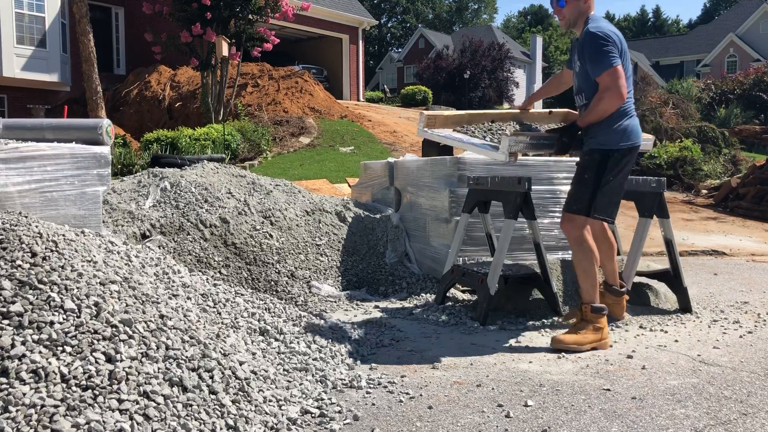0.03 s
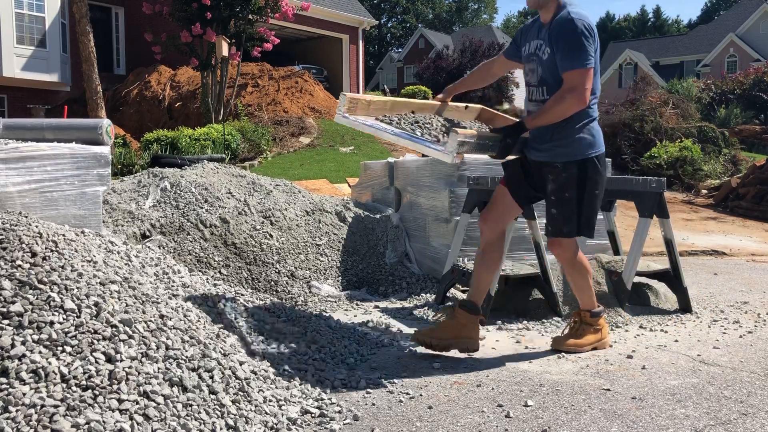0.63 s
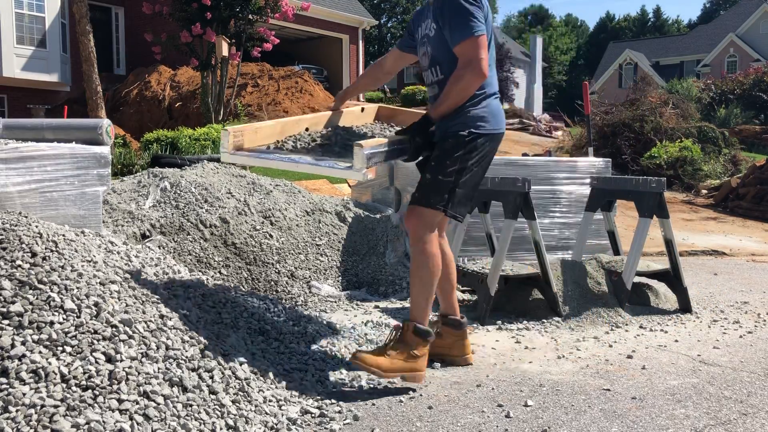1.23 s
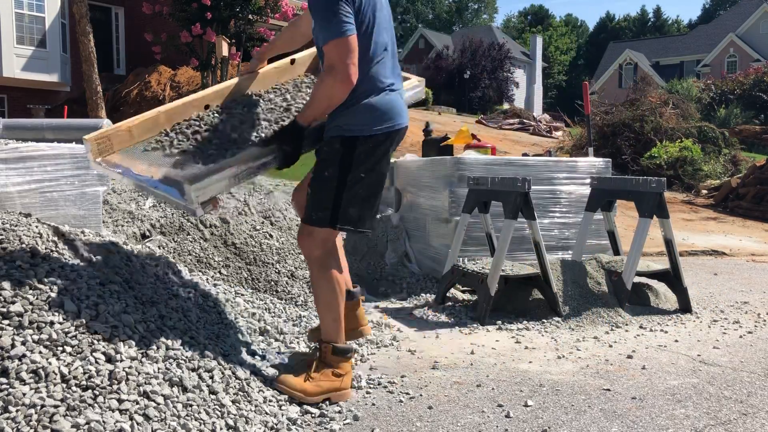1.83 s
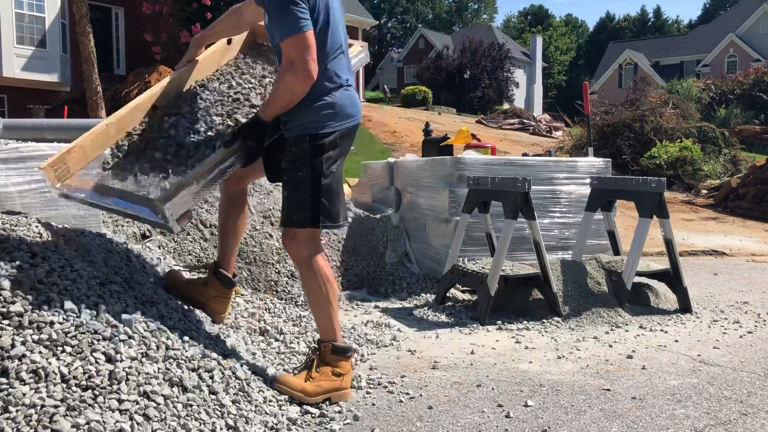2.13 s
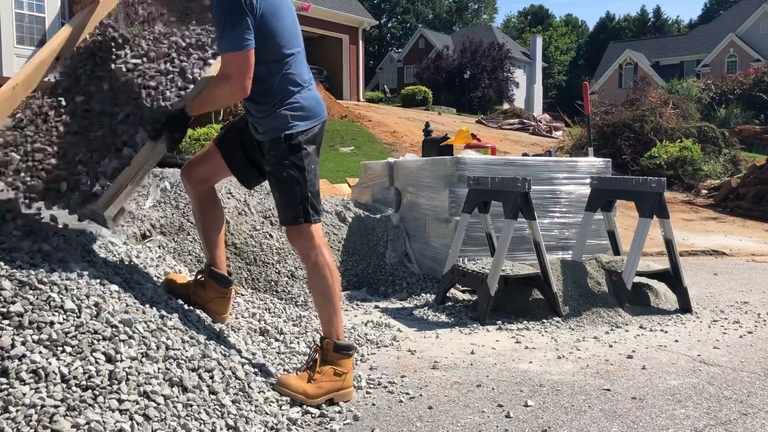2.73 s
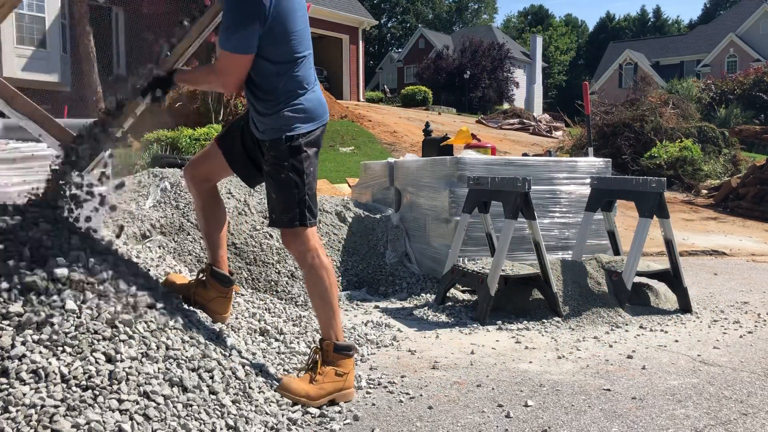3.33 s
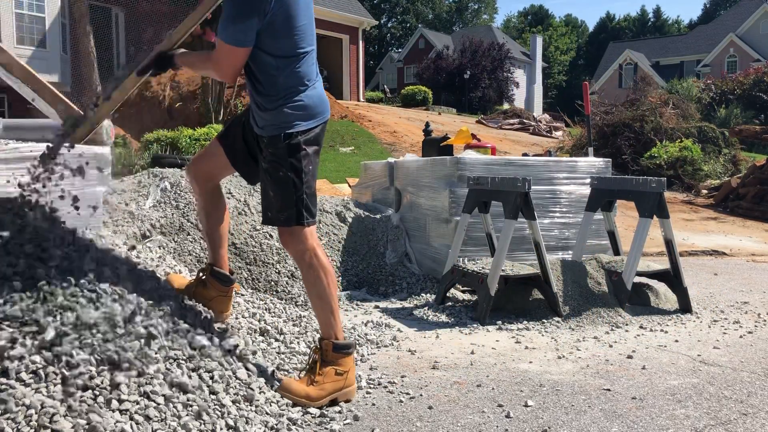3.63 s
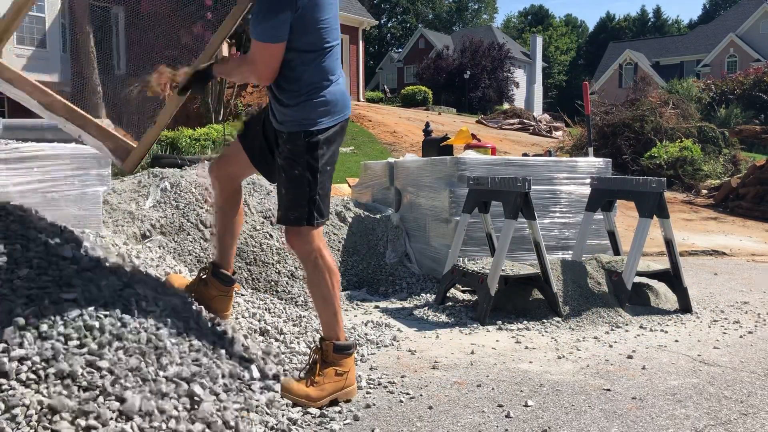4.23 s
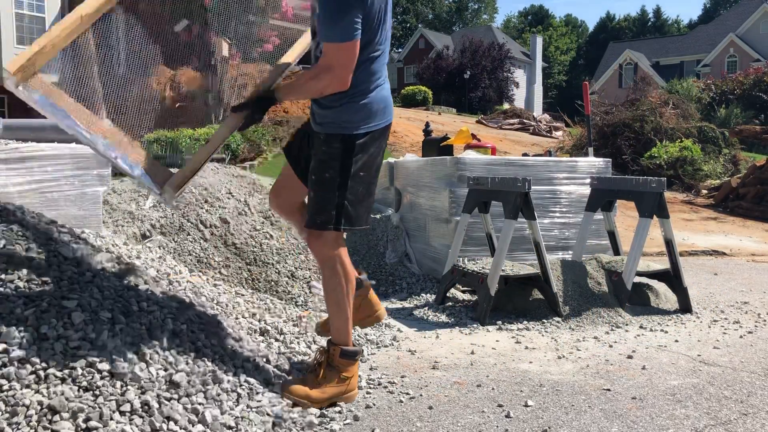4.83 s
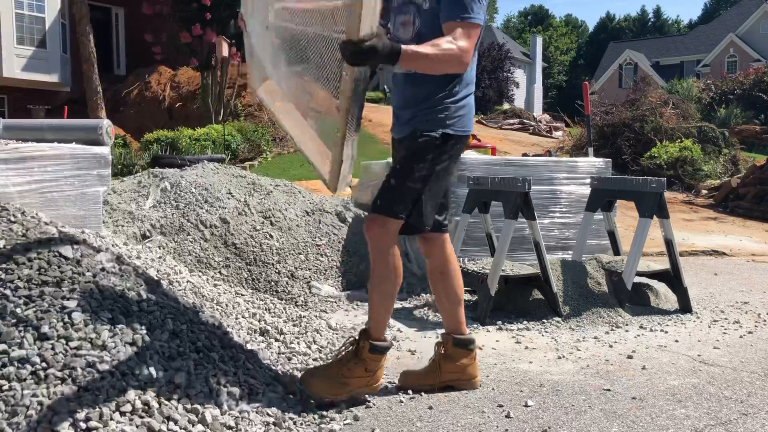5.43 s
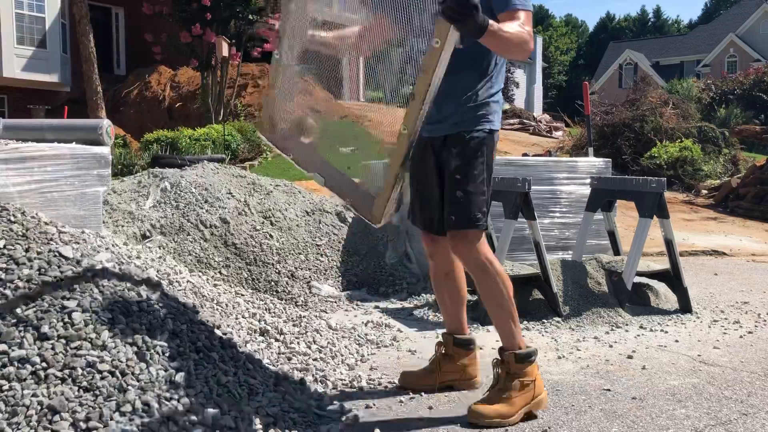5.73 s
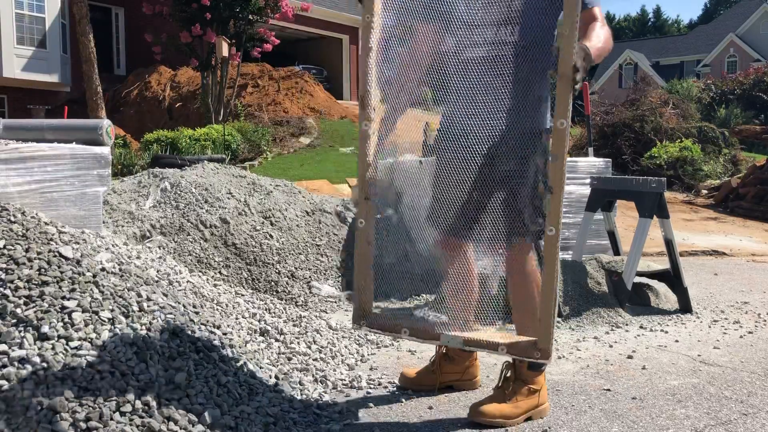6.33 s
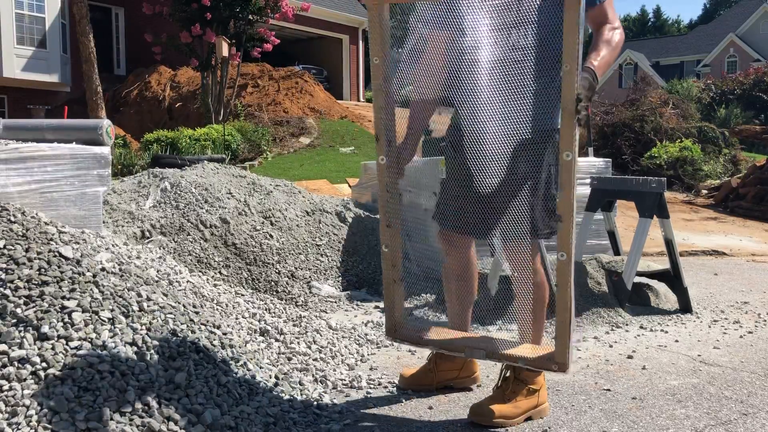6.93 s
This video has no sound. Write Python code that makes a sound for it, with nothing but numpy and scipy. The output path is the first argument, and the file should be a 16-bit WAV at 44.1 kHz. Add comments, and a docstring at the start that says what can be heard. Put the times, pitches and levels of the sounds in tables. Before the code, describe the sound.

Boots crunch over grit, then gravel rushes off a mesh screen onto a pile, trickles down, and the empty screen rattles.

```python
"""Gravel slides off a wood-framed mesh screen as a worker tips it onto a pile.
Many small impacts drive the resonances of the screen, rain on the pile and trickle down its side.
Boots thud and crunch on the gritty driveway as the load is carried, and the emptied screen
rattles as it is stood upright. A distant machine hums under the murmur of the street."""
import sys
import numpy as np
from scipy import signal
from scipy.fft import rfft, irfft, next_fast_len
from scipy.io import wavfile
from scipy.ndimage import uniform_filter1d, map_coordinates

SR = 44100
rng = np.random.default_rng(int(sys.argv[2]) if len(sys.argv) > 2 else 0)


def waveform_to_disk(signal):
    """Save audio, clipped to [-1, 1], as 16-bit WAV at the path in sys.argv[1]."""
    frames = np.transpose(np.atleast_2d(signal))
    scaled = np.clip(frames, -1, 1) * 32767
    samples = np.round(scaled).astype(np.int16)
    wavfile.write(sys.argv[1], SR, samples)


N = 307818
TOP_HZ = 15950  # upper band limit


def gravel_on_mesh():
    """Forced vibration: sliding stones drum on the screen, which brightens as its load runs off."""
    # flow off the tilted mesh: time_s, level_db
    tipping = [(1.88, -60), (1.96, -51), (2.12, -47.5), (2.24, -39.5), (2.52, -35), (2.94, -22.8),
               (3.14, -25), (3.38, -34), (3.68, -36.5), (3.83, -46)]
    # the load shifting as it is carried: start_s, length_s, level_db
    shifts = [(1.038, 0.068, -51), (1.24, 0.13, -56), (1.6, 0.18, -53)]
    # spectrum of the loaded screen: frequency_hz, gain_db
    loaded_spectrum = [(40, -62), (160, -14.5), (330, -7.5), (480, -8), (650, -1.5), (1200, -3), (2800, -6),
                       (4300, -1), (6000, -4), (9000, -12.5), (16000, -18)]
    # spectrum as the load runs off: frequency_hz, gain_db
    running_spectrum = [(40, -51), (160, -17), (300, -23.5), (430, -7.5), (560, -6.5), (720, -9), (950, 0),
                        (1500, -2.5), (2900, -3), (4200, 2), (6000, -1), (8500, -1.5), (10500, -10.5),
                        (16000, -21.5)]
    shifting = sum(swell(s, length, db, rise=110, sag=14, release=150) for s, length, db in shifts)
    flow = level(tipping, fade_s=0.12) + shifting
    share = flow / flow.max()
    stick_slip = amp((1 - np.sqrt(share)) * (2 * wobble(27.95) - 2.54))  # strongest in a slow load
    hits = flow * stick_slip * collisions(1600 + 14000 * share, spread_db=1, ring_s=0.0041)
    loaded = coloured(hits, lambda hz: along(loaded_spectrum, hz) + screen_resonance(hz))
    running = coloured(hits, lambda hz: along(running_spectrum, hz) + screen_resonance(hz))
    emptied = np.interp(np.arange(N) / SR, [2.35, 2.85], [0, 1])
    return amp(5) * (1 - emptied) * loaded + amp(4.5) * emptied * running


def screen_resonance(hz):
    """Resonance: each mode of the mesh and frame adds a bell-shaped peak to the gain in dB."""
    # modes of the screen: centre_hz, width_hz, gain_db
    modes = [(663, 194, 7), (936, 81, 4.5), (1080, 76, 2), (1440, 240, 4.5), (1747, 320, 4),
             (2316, 360, 4.5), (2570, 190, 3.5), (3116, 420, 3.5), (3710, 500, 4.5), (4240, 320, 1)]
    return sum(db / (1 + (2 * (hz - centre) / width) ** 2) for centre, width, db in modes)


def gravel_on_pile():
    """Hard impact: brief stone-on-stone contacts give bright clicks that thin out with the stream."""
    # spectrum of stones landing: frequency_hz, gain_db
    spectrum = [(30, -44), (170, -11.5), (300, -17), (700, -26), (2000, -33), (3800, -10.5), (6000, -6),
                (8500, 0), (12000, -3.5), (16000, -6.5)]
    spilling = np.clip((np.arange(N) / SR - 2.15) / 0.04, 0, 1)  # the first stones leave the edge
    flow = spilling * swell(start_s=2.96, length_s=0.87, db=-25.5, rise=32, sag=4, release=21)
    hits = collisions(200 + 10000 * flow / flow.max(), spread_db=3, ring_s=0.0052)
    hits *= amp(1.45 * wobble(60))
    return amp(1) * coloured(flow * hits, lambda hz: along(spectrum, hz))


def slope_flow():
    """Incoherent addition: runs of stones down the slope sum in power to one amplitude envelope."""
    # runs set off by the pour and by a boot leaving the pile: start_s, length_s, level_db
    runs = [(3.3, 1.9, -26.5), (4.699, .62, -46)]
    power = sum(swell(s, length, db, rise=100, sag=13, release=140) ** 2 for s, length, db in runs)
    return np.sqrt(power)


def trickle(flow):
    """Granular flow: rolling stones collide more rarely and more softly as the flow dies down."""
    # spectrum of rolling stones: frequency_hz, gain_db
    spectrum = [(40, -32), (200, -8), (600, -11.5), (1200, -9), (2700, -7.5), (3800, -1.5), (6500, -1),
                (10000, -12), (16000, -19)]
    hits = collisions(800 + 7000 * flow / flow.max(), spread_db=4, ring_s=0.0049)
    return amp(-1.2) * coloured(flow * hits, lambda hz: along(spectrum, hz))


def collisions(rate_per_s, spread_db, ring_s):
    """Shot noise: stone impacts of uneven size arrive at random, with a mean power near 1."""
    rate = np.clip(rate_per_s * np.ones(N), 20, 12000)
    onsets = np.flatnonzero(rng.random(N) < rate / SR)
    sizes = unit(amp(spread_db * np.minimum(rng.standard_normal(len(onsets)), 2)))
    sizes *= np.sqrt(SR / rate[onsets])
    bank = pebbles(ring_s)
    grains = bank[rng.integers(len(bank), size=len(onsets))] * sizes[:, None]
    positions = onsets[:, None] + np.arange(bank.shape[1])
    return np.bincount(positions.ravel(), grains.ravel(), N)[:N]


def pebbles(ring_s, count=600, size=128):
    """Free vibration: each struck stone in this bank of clicks rings in three quickly damped modes."""
    t = np.arange(size) / SR
    hz = rng.uniform(0, TOP_HZ, (count, 3, 1))
    t60 = ring_s * np.exp(0.5 * rng.standard_normal((count, 3, 1)))
    bank = (np.cos(2 * np.pi * hz * t) * amp(-60 * t / t60)).sum(1)
    bank *= rng.choice([-1, 1], (count, 1))
    return bank / np.linalg.norm(bank, axis=1, keepdims=True)


def stone_snaps(grit, flow):
    """Impact and settling: one stone clicks against another, then chatters briefly."""
    # the loudest snaps: start_s, level_db, pitch_hz, edge_db
    snaps = [(0.17, -26, 6800, -28), (0.2446, -20.5, 8680, -29), (0.397, -25.5, 4700, -17),
             (0.4318, -26.5, 6690, -24), (0.4983, -29.5, 5060, -19), (0.699, -28, 4870, -20),
             (0.761, -29, 5300, -17), (0.866, -24, 4470, -13), (0.877, -29, 5130, -8),
             (1.2242, -28, 7370, -4.5), (1.279, -33, 4960, -9), (1.514, -29.5, 4400, -6),
             (1.705, -32, 4660, -3), (4.5796, -24, 7000, -14), (4.6818, -17, 6400, -14),
             (4.7334, -13, 5760, -18), (4.817, -20.5, 4200, -27), (4.9904, -19.5, 4840, -18),
             (5.0663, -23.5, 6700, -27), (5.367, -22, 6620, -24), (5.7677, -21, 5900, -23),
             (5.8494, -16, 4300, -17), (6.3343, -31, 5110, -14), (6.3648, -27, 5370, -9),
             (6.4402, -30, 4600, -20), (6.5969, -31.5, 4900, -12), (6.6935, -33, 5100, -13),
             (6.7252, -34.5, 6950, -2)]
    out = np.zeros(N)
    stir = amp(23) * grit + amp(15.5) * flow
    for s, db, hz, edge_db in snaps + stray_snaps(stir):
        click = burst(t60=0.0032, rise_s=0.00005)
        chatter = amp(-17) * burst(t60=0.025, rise_s=0.001)
        add(out, s, stone(click + chatter, db - 11.5, hz, db + edge_db, octaves=0.75))
    return out


def stray_snaps(stir, count=150, rate_per_s=17):
    """Random impacts, as loud as the stones are stirred: start_s, level_db, pitch_hz, edge_db."""
    start_s = (np.arange(count) + rng.random(count)) / rate_per_s
    size, pitch, edge = np.clip(rng.standard_normal((count, 3)), -2, 2).T
    stir_db = 20 * np.log10(np.interp(start_s, np.arange(N) / SR, stir) + 1e-9)
    return list(zip(start_s, stir_db + 3.5 * size, 5750 * 2 ** (0.31 * pitch), -19.5 + 4 * edge))


def stone(contact, body_db, pitch_hz, edge_db, octaves):
    """Source and filter: a contact excites the stone's body, and a hard one adds a sharp edge."""
    # spectrum of the sharp edge: frequency_hz, gain_db
    edge_spectrum = [(3000, -54), (9000, -13.5), (12500, 5.5), (15000, -1)]
    resonance, roll_off = hump(pitch_hz, octaves), [(10000, 2), (14000, -12.5)]
    body = coloured(contact, lambda hz: resonance(hz) + along(roll_off, hz))
    edge = coloured(contact, lambda hz: along(edge_spectrum, hz))
    return struck(body, body_db) + struck(edge, edge_db)


def mesh_rattle():
    """Impulsive excitation: the empty mesh slaps its frame and the slack wires ring on unevenly."""
    # slaps of the mesh: start_s, level_db, pitch_hz
    slaps = [(5.873, -18.5, 5000), (5.905, -11.5, 5170), (5.926, -16, 5730), (5.975, -15.5, 2850),
             (6.0105, -18, 2640), (6.16, -26, 4920), (6.266, -23, 4020), (6.349, -28, 2880)]
    # spectrum of a slap: frequency_hz, gain_db
    spectrum = [(200, -12), (650, -6), (950, 1), (1450, -2.5), (2000, -4.5), (3000, -5.5), (5500, -1.5),
                (8000, -8), (10000, -15), (16000, -7)]
    # modes of the wires: pitch_hz, level_db, t60_s
    wire_modes = [(938, 0, 0.37), (1390, 5, 0.15), (1484, -1, 0.34), (1760, 1, 0.2), (2720, 0, 0.31),
                  (3770, -7, .22), (5028, -7, .2), (5700, -14, 0.22)]
    out, t = np.zeros(N), np.arange(SR // 2) / SR
    for s, db, pitch_hz in slaps:
        contact = hump(pitch_hz, octaves=0.97)
        impact = burst(t60=0.037, rise_s=0.00014)
        slap = coloured(impact, lambda hz: along(spectrum, hz) + screen_resonance(hz) + contact(hz))
        add(out, s, struck(slap, db - 12.5))
        for hz, mode_db, t60 in wire_modes:
            jittered_hz = hz + 14 * np.sqrt(hz) * rng.standard_normal(len(t))
            phase = 2 * np.pi * np.cumsum(jittered_hz) / SR
            onset_db = db - 34.5 + mode_db + 2 * rng.standard_normal()
            add(out, s, amp(onset_db - 60 * t / t60) * np.sin(phase))
    return out


def sole_pressure():
    """Contact loading: each step swells and fades, giving envelopes for grit and for bare concrete."""
    # a sole pressing and dragging: start_s, length_s, grit_db, scuff_db
    steps = [(0.02, 0.23, -58, -53.5), (0.35, 0.38, -53.5, -62.5), (0.82, 0.072, -48.5, -53),
             (1.542, 0.07, -57, -61), (1.778, 0.017, -56.5, -56), (5.238, 0.043, -46.5, -60),
             (5.41, 0.33, -48.5, -63), (5.818, 0.2, -48, -55.5), (6.16, 0.21, -53.5, -66),
             (6.55, 0.365, -61, -77)]
    grit, scuff = np.zeros(N), np.zeros(N)
    for s, length, grit_db, scuff_db in steps:
        weight = swell(s, length, 0, rise=290, sag=7.8, release=152)
        grit += amp(grit_db) * weight
        scuff += amp(scuff_db) * weight
    return grit, scuff


def sole_friction(grit, scuff):
    """Friction: soles crackle on grit, scrape the concrete and grind over loose stones."""
    # spectrum of grit underfoot: frequency_hz, gain_db
    grit_spectrum = [(40, -40), (300, -13), (700, -3), (1500, -5.5), (2800, -3.5), (4000, 2), (6500, 0.5),
                     (10000, -10), (16000, -9.5)]
    # spectrum of scraped concrete: frequency_hz, gain_db
    scuff_spectrum = [(40, -45), (300, 1), (800, -0.5), (1700, -3), (2600, -8.5), (5000, -7.5), (8000, -10),
                      (16000, -25)]
    # loose stones grinding: start_s, level_db, pitch_hz, edge_db
    crunches = [(0.0752, -23.5, 7250, -31), (0.147, -27, 6130, -27), (0.7737, -30, 4630, -15),
                (0.848, -30, 4440, -11), (1.5626, -25.5, 4940, -13), (1.6177, -28.5, 6560, -24),
                (1.809, -30.5, 4270, -18), (5.2434, -26.5, 7390, -7), (5.8015, -21.5, 3500, -20)]
    crackle = grit * amp(2.4 * wobble(25)) * collisions(1100, spread_db=5.5, ring_s=0.0077)
    scrape = scuff * collisions(4000, spread_db=13, ring_s=0.0077)
    out = amp(-2) * coloured(crackle, lambda hz: along(grit_spectrum, hz))
    out += amp(1.5) * coloured(scrape, lambda hz: along(scuff_spectrum, hz))
    for s, db, hz, edge_db in crunches:
        grind = burst(t60=0.041, rise_s=0.0029)
        roughness = amp(4 * rng.standard_normal(len(grind) // 32)).repeat(32)
        add(out, s, stone(grind * roughness, db - 12.5, hz, db + edge_db - 1.5, octaves=0.6))
    return out


def thuds_and_knocks():
    """Heavy damping: blows die away at once, the soft ones as low thuds, the hard ones as knocks."""
    # soft blows of boots and of the handled frame: start_s, level_db, pitch_hz
    thuds = [(0.652, -42.5, 243), (2.178, -31, 260.6), (3.422, -35, 207), (3.75, -33.5, 374),
             (3.878, -34.5, 253), (5.155, -40, 266), (5.288, -34.5, 163)]
    # hard blows of heels and wood, each over a thud: start_s, level_db, pitch_hz, thud_db
    knocks = [(0.023, -43, 1080, -39), (0.246, -31, 1170, -37), (0.816, -26.5, 1470, -44),
              (0.826, -23, 1070, -30), (0.897, -29.5, 1130, -46), (0.907, -35, 1770, -36),
              (1.565, -31, 940, -34.5), (1.668, -26.5, 1800, -52), (4.735, -33, 2900, -47),
              (4.839, -32.5, 1410, -50), (5.248, -30, 870, -45), (5.802, -28.5, 1530, -29.5),
              (5.82, -27, 1600, -36), (5.848, -20, 1760, -32.5), (5.872, -26.5, 942, -46),
              (6.333, -32.5, 1250, -39), (6.405, -32, 880, -42), (6.597, -39.5, 880, -45)]
    out, thud_hz = np.zeros(N), 307
    for s, db, hz in thuds + [(s, thud_db, thud_hz) for s, _, _, thud_db in knocks]:
        thud = coloured(burst(t60=0.05, rise_s=0.0017), hump(hz, octaves=0.67))
        add(out, s, struck(thud, db - 4))
    for s, db, hz, _ in knocks:
        knock = coloured(burst(t60=0.023, rise_s=0.00054), hump(hz, octaves=0.61))
        add(out, s, struck(knock, db - 6.5))
    return out


def reflections(direct):
    """Diffuse scattering: the ground and house fronts return a faint, short tail."""
    response = coloured(burst(t60=0.19, rise_s=0.0008), hump(1800, octaves=2.03))
    return amp(-18) * signal.fftconvolve(direct, response / np.linalg.norm(response))[:N]


def street_murmur():
    """Ambient noise: a low, broadband murmur whose level drifts slowly."""
    # spectrum of the open air: frequency_hz, gain_db
    spectrum = [(20, -42), (40, -9), (62, -6), (90, -0.5), (130, -1), (230, -3.5), (350, -7.5), (600, -16),
                (1000, -16), (1500, -23.5), (2800, -27), (3800, -20), (6000, -27.5), (9000, -53),
                (16000, -43)]
    murmur = coloured(rng.standard_normal(N), lambda hz: along(spectrum, hz), size=8192)
    return amp(-55 + 0.65 * wobble(2.2)) * murmur


def machine_hum():
    """Harmonic series: a distant machine sounds three partials that waver together."""
    # strength of the two lowest partials: time_s, fundamental_db, octave_db
    partials = [(0, -58, -66), (2.5, -61.5, -67), (4.8, -63, -56.5), (6.98, -54, -61)]
    pitch_hz = 66.5 + 1.76 * wobble(7.9)
    phase = 2 * np.pi * np.cumsum(pitch_hz) / SR
    gains = [level(np.array(partials)[:, [0, k]]) for k in (1, 2)] + [amp(-68.5)]
    tones = sum(gain * np.sin(k * phase) for k, gain in enumerate(gains, 1))
    return amp(2 + 1.2 * wobble(14)) * tones


def amp(db):
    """Decibels as an amplitude ratio."""
    return 10 ** (np.asarray(db) / 20)


def unit(x):
    """Normalisation to rms 1."""
    return x / np.sqrt(np.mean(x ** 2) + 1e-20)


def along(points, hz):
    """Interpolation of (frequency_hz, gain_db) points on a logarithmic frequency axis."""
    frequency_hz, gain_db = np.transpose(points)
    return np.interp(np.log(hz + 1), np.log(frequency_hz + 1), gain_db)


def level(rows, fade_s=0.1):
    """Amplitude envelope through (time_s, level_db) rows, losing 20 dB per fade_s outside them."""
    s, db = np.transpose(rows)
    t = np.arange(N) / SR
    outside = np.maximum(0, np.maximum(s[0] - t, t - s[-1]))
    return amp(np.interp(t, s, db) - 20 * outside / fade_s)


def swell(start_s, length_s, db, rise, sag, release):
    """Exponential envelope: reaches db at start_s, sags for length_s, dies away; slopes in dB per s."""
    t = np.arange(N) / SR - start_s
    decay_db = sag * np.clip(t, 0, length_s) + release * np.maximum(t - length_s, 0)
    return amp(db + rise * np.minimum(t, 0) - decay_db)


def wobble(rate):
    """Random modulation: a smooth curve with rate knots a second."""
    knots = rng.standard_normal(int(N * rate / SR) + 4)
    return map_coordinates(knots, [np.arange(N) * rate / SR])


def coloured(x, shape_db, size=2048):
    """Minimum-phase filtering: a response of unit energy, shaped in dB by shape_db(hz)."""
    cepstrum = irfft(np.log(amp(shape_db(np.fft.rfftfreq(size, 1 / SR)))))
    cepstrum[1:size // 2] *= 2  # folding the cepstrum makes the response causal
    cepstrum[size // 2 + 1:] = 0
    response = irfft(np.exp(rfft(cepstrum)))
    return signal.fftconvolve(x, response / np.linalg.norm(response))[:len(x)]


def hump(centre_hz, octaves):
    """A broad resonance as a shape in dB, at half power this many octaves from its centre."""
    return lambda hz: -10 * np.log10(1 + (np.log2((hz + 1) / centre_hz) / octaves) ** 4)


def burst(t60, rise_s, size=8192):
    """A noise transient that swells, then decays by 60 dB in t60 seconds."""
    t = np.arange(size) / SR
    return rng.standard_normal(size) * amp(-60 * t / t60) * (1 - np.exp(-t / rise_s))


def struck(x, db, size=128):
    """Normalisation of a transient: its loudest 3 ms have an rms level of db."""
    return amp(db) * x / np.sqrt(np.max(uniform_filter1d(x * x, size)))


def add(track, start_s, x):
    """Superposition of x on the track from start_s."""
    start = max(0, round(start_s * SR))
    track[start:start + len(x)] += x[:max(0, len(track) - start)]


def scene():
    """Superposition: near sources, their reflections and the background, alike in both channels."""
    grit, scuff = sole_pressure()
    flow = slope_flow()
    near = gravel_on_mesh() + gravel_on_pile() + trickle(flow)
    near += sole_friction(grit, scuff) + stone_snaps(grit, flow) + thuds_and_knocks() + mesh_rattle()
    mix = near + reflections(near) + street_murmur() + machine_hum()
    return np.array([mix, mix])


def record(dry):
    """Band limiting: an ideal low-pass filter removes everything above TOP_HZ."""
    size = next_fast_len(N + 8192)
    passband = np.fft.rfftfreq(size, 1 / SR) < TOP_HZ
    return irfft(rfft(dry, size) * passband, size)[:, :N]


dry = scene()
out = record(dry)
waveform_to_disk(out)
```